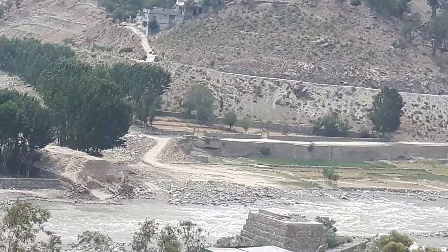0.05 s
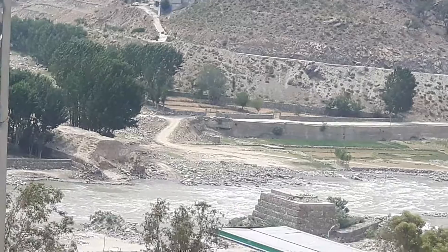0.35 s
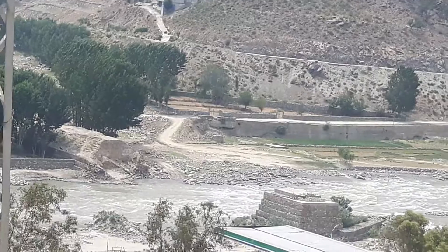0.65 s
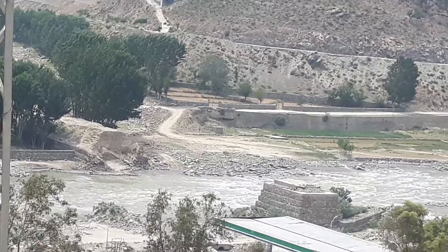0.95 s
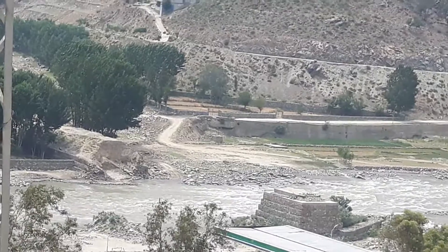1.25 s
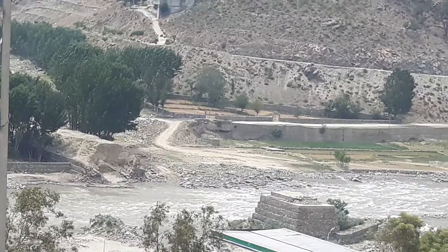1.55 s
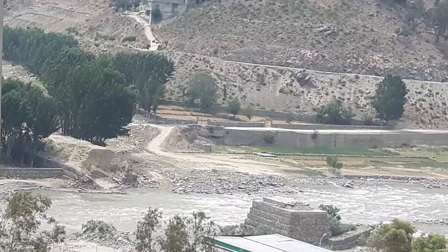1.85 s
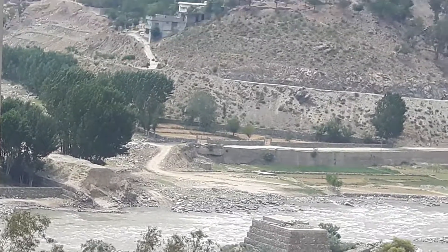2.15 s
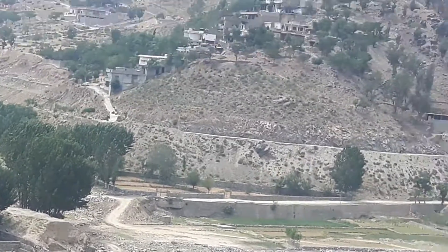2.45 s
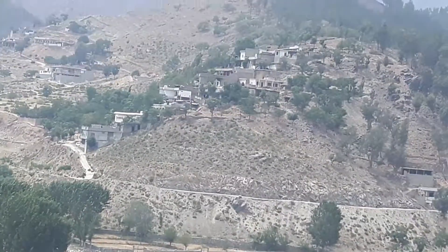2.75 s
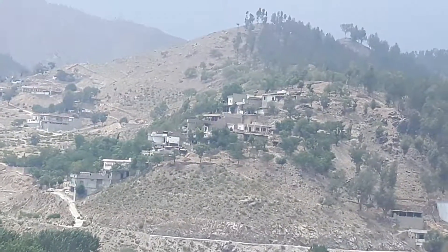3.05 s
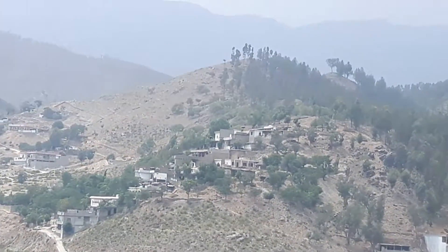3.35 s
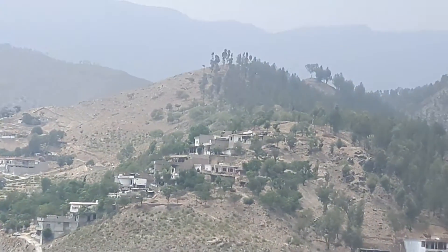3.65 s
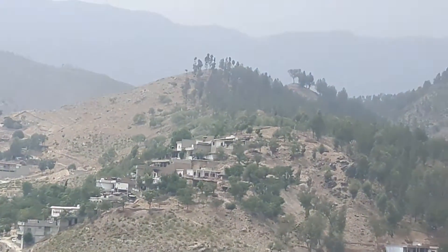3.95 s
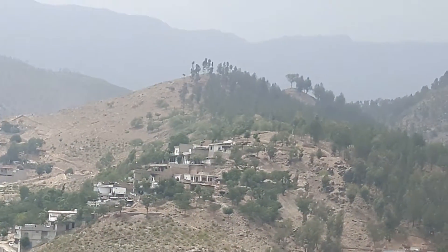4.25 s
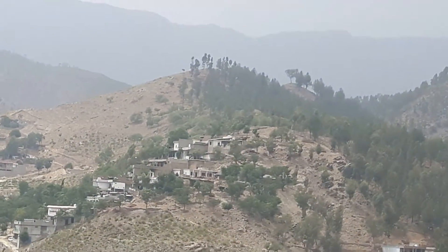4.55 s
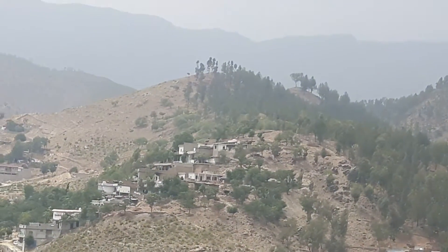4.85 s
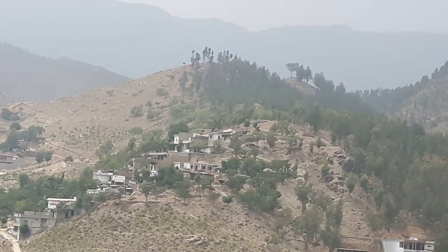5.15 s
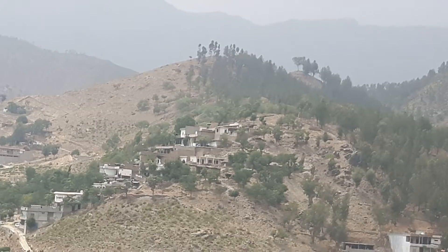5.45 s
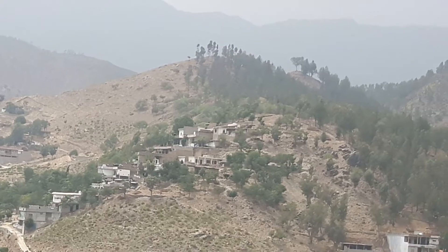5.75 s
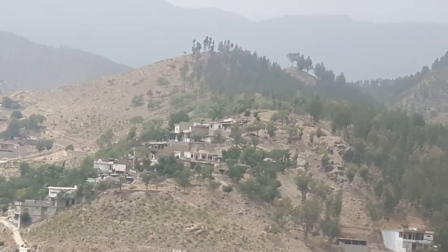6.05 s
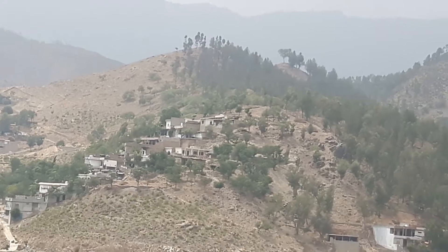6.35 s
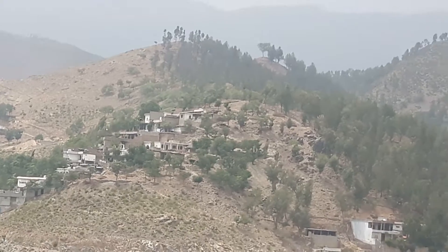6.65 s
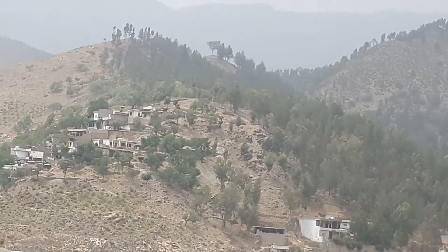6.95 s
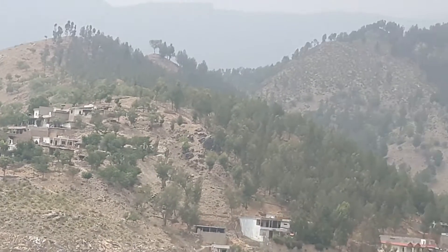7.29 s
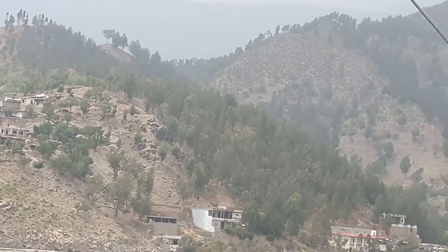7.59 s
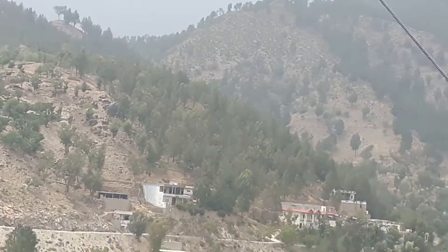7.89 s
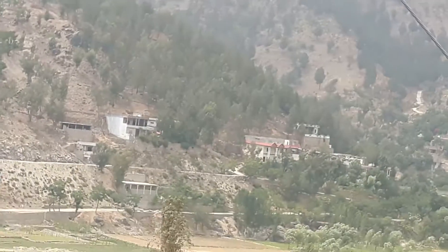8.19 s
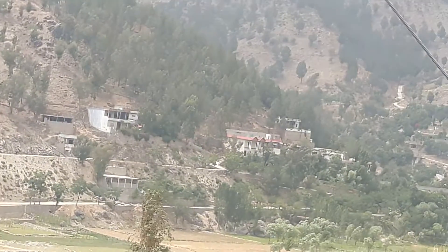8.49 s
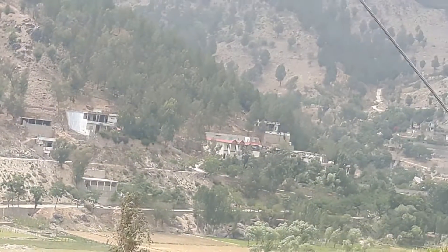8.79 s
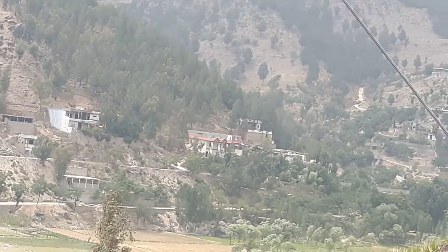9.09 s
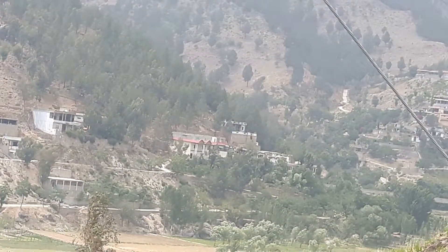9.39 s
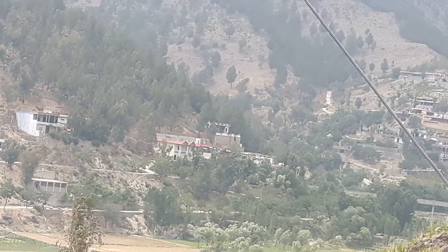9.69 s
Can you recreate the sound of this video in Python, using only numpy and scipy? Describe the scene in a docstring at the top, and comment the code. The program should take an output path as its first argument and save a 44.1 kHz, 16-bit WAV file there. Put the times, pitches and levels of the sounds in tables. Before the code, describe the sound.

A fast river rushes far below while gusts of wind rumble and thump against the microphone outdoors.

```python
"""Wind buffets the microphone: gusts carry eddies past its port, louder and higher the harder they blow.
Behind it a fast river rushes on the valley floor below, countless bubbles dulled by distance.
Near by, air hisses and faintly whistles round obstacles, and leaves brush together.
Far machinery hums faintly, and a distant bird gives a few falling chirps near the end."""
import sys
import numpy as np
from scipy import signal
from scipy.fft import rfft, irfft, next_fast_len
from scipy.io import wavfile
from scipy.ndimage import uniform_filter1d, map_coordinates

SR = 44100
rng = np.random.default_rng(int(sys.argv[2]) if len(sys.argv) > 2 else 0)


def unload_audio(sound):
    """Save the sound as a 16-bit wav file, at the path given as the first command line argument."""
    columns = np.transpose(np.atleast_2d(sound))
    # keep every value between -1 and 1, then stretch to whole-number steps
    steps = np.round(np.clip(columns, -1, 1) * 32767)
    wavfile.write(sys.argv[1], SR, steps.astype(np.int16))


N = 433503

# gusts at the port, head-on ones pitched above grazing ones: middle t/s, length/s, level/dB, shift/octaves
GUSTS = [(0.43, .11, -21, -0.052), (.83, .11, -18, -0.18), (1.068, 0.048, -29, -0.23),
         (1.168, 0.066, -25, -0.19), (1.383, .14, -26, -0.18), (1.564, 0.049, -20, -0.23),
         (1.709, .12, -31, -0.21), (2.537, 0.089, -26, -0.38), (3.109, .16, -26, -0.43),
         (3.561, 0.057, -29, -0.13), (3.762, 0.21, -23, 0.16), (4.018, 0.092, -17, -0.34),
         (4.158, 0.047, -26, -.1), (4.296, 0.045, -26, 0), (4.455, 0.15, -20, .1), (4.585, 0.045, -26, -.1),
         (4.707, .03, -19.5, -0.41), (5.425, .2, -16, -.1), (5.742, .18, -16.5, 0.028),
         (6.379, 0.41, -24, -0.044), (6.77, .17, -23.5, -.1), (7.046, .19, -20, -0.038),
         (8.827, .11, -22, -.05), (9.199, .11, -30.5, -0.13), (9.564, .13, -20, -.2)]


def from_db(db):
    """Decibels to gain."""
    return 10 ** (np.asarray(db) / 20)


def rms_one(x):
    """Scale to unit power."""
    return x / np.sqrt(np.mean(x ** 2) + 1e-20)


def in_time(rows):
    """A curve through (t/s, value) points, at every sample."""
    return np.interp(np.arange(N) / SR, *np.transpose(rows))


def coloured(x, spectrum):
    """EQ a signal through (f/Hz, level/dB) points; unit power."""
    hz, db = np.transpose(spectrum)
    bins = np.maximum(np.fft.rfftfreq(len(x), 1 / SR), 1)
    gain = from_db(np.interp(np.log(bins), np.log(hz), db))
    return rms_one(irfft(rfft(x) * gain, len(x)))


def drift(rate_hz):
    """Smooth random modulation, mostly slower than rate_hz; unit power."""
    size = next_fast_len(N)
    rolloff = 1 + (np.fft.rfftfreq(size, 1 / SR) / rate_hz) ** 2
    return rms_one(irfft(rfft(rng.standard_normal(size)) / rolloff, size)[:N])


def resonance(x, hz, width_hz):
    """Two-pole band-pass with gain 1 at its peak."""
    r = np.exp(-np.pi * width_hz / SR)
    feedback = [1, -2 * r * np.cos(2 * np.pi * hz / SR), r * r]
    return signal.lfilter(np.array([1, 0, -1]) * (1 - r * r) / 2, feedback, x)


def swell(middle_s, length_s, steepness=3.0):
    """Envelope of a puff of air: it rises to 1, holds briefly and falls away."""
    away = np.abs(np.arange(N) / SR - middle_s) / (length_s / 2)
    return np.where(away < 4, np.exp(-away ** steepness), 0)


def bird(blur=.6):
    """Each far chirp is a short whistle that slides down, blurred by its many paths through the trees."""
    # falling chirps: t/s, length/s, start f/Hz, end f/Hz, level/dB
    chirps = [(8.871, 0.067, 4850, 4070, -71), (9.061, 0.036, 5150, 4750, -78),
              (9.541, 0.043, 4935, 4587, -69.5), (9.569, 0.019, 4282, 4173, -65)]
    out = np.zeros(N)
    for s, length_s, start_hz, end_hz, db in chirps:
        size, at = int(length_s * SR), int(s * SR)
        phase = 2 * np.pi * np.cumsum(np.linspace(start_hz, end_hz, size)) / SR
        out[at:at + size] += from_db(db) * np.sqrt(np.hanning(size)) * np.sin(phase)
    return out * (1 - blur + blur * drift(150))


def leaves(touches_per_s=2700.0, spread_db=3.0, idle_db=-86.5, tick_s=.002):
    """Leaf brushes leaf in a dense patter of uneven touches, with now and then a sharper tick."""
    # flurries in the leaves: middle t/s, length/s, level/dB
    flurries = [(1.246, 0.84, -81.5), (1.898, .35, -77)]
    # tone of the rustle: f/Hz, relative level/dB
    rustle = [(1000, -22), (3000, 5.5), (4400, 6.5), (5600, -8.5), (7400, 0.5), (9000, -9.5), (15000, -26)]
    # small dry ticks: t/s, level/dB
    ticks = [(1.2683, -61), (2.0472, -69), (6.27, -65), (8.4566, -63)]
    size = next_fast_len(N)
    touches = (rng.random(size) < touches_per_s / SR) * rng.standard_normal(size)
    touches *= from_db(spread_db * np.minimum(rng.exponential(1, size), 5))
    stir = from_db(idle_db) + sum(from_db(db) * swell(s, length_s) for s, length_s, db in flurries)
    out = stir * coloured(touches, rustle)[:N]
    crack = coloured(rng.standard_normal(size), rustle)
    age = np.arange(SR // 20) / SR
    for s, db in ticks:
        near = slice(int(s * SR), int(s * SR) + len(age))
        out[near] += from_db(db) * np.exp(-age / tick_s) * crack[near]
    return out


def sweeping_air(whistle_width_hz=27):
    """Air hisses round nearby obstacles, and the vortices it sheds sound a breathy whistle."""
    # sweeps of air: middle t/s, length/s, hiss level/dB, whistle level/dB, whistle f/Hz
    sweeps = [(2.037, 0.32, -62, -67, 1810), (2.621, 0.76, -61, -59.5, 1822),
              (4.455, 0.61, -61.5, -59.5, 1768), (5.072, 0.32, -65, -59.5, 1760),
              (6.37, 0.61, -63, -59.5, 1825), (7.05, .7, -65.5, -62.5, 1791), (8.93, .35, -68, -59.5, 1807)]
    # tone of the hiss: f/Hz, relative level/dB
    hiss_tone = [(800, -18), (1500, -2.5), (2100, 6), (2900, -6), (3800, -12), (4600, -12), (5600, -30.5),
                 (9000, -49)]
    hiss = coloured(rng.standard_normal(next_fast_len(N)), hiss_tone)[:N]
    vortices = rng.standard_normal(N)
    out = np.zeros(N)
    for s, length_s, hiss_db, whistle_db, hz in sweeps:
        whistle = rms_one(resonance(vortices, hz, whistle_width_hz))
        out += swell(s, length_s) * (from_db(hiss_db) * hiss + from_db(whistle_db) * whistle)
    return out


def machinery():
    """A low hum whose tones waver and fade on their way across the valley."""
    # tones of the hum: f/Hz, width/Hz, level/dB
    tones = [(68, 6.5, -62), (94.2, 4.9, -48), (147.7, 3.6, -50.5), (178.4, 3.2, -53), (202.4, 6.2, -52),
             (325, 9.7, -52.5), (356, 4.1, -54.5)]
    out = np.zeros(N)
    for hz, width_hz, db in tones:
        phase = 2 * np.pi * hz * np.arange(N) / SR
        out += from_db(db) * (drift(width_hz / 2) * np.cos(phase) + drift(width_hz / 2) * np.sin(phase))
    return out


def river(gain_db=12.0, churn_db=1.23, churn_hz=4.9):
    """Countless far bubbles merge into a rush; each size of bubble swells and ebbs as the rapids churn."""
    # the river bed of sound, a little louder when the microphone faces it: t/s, level/dB before gain_db
    flow = [(0.1, -52.5), (1.54, -53.5), (5.5, -52), (9.7, -53.5)]
    # tone of the rush, dulled by distance: f/Hz, relative level/dB
    rush_tone = [(20, -26), (50, -6.5), (90, 2.5), (230, 4), (350, 6), (480, 0), (800, -2), (1150, -8.5),
                 (1750, -12), (2300, -20), (2950, -28.5), (4000, -37), (5600, -49.5), (9000, -58.5)]
    size = next_fast_len(N)
    rush = rfft(coloured(rng.standard_normal(size), rush_tone))
    octave = np.log2(np.maximum(np.fft.rfftfreq(size, 1 / SR), 1))
    out = np.zeros(N)
    for centre in range(4, 15):   # octave bands, 16 Hz to 16 kHz
        band = irfft(rush * np.maximum(1 - np.abs(octave - centre), 0), size)[:N]
        out += band * from_db(churn_db * drift(churn_hz))
    return out * from_db(in_time(flow) + gain_db)


def wind_pressure(gust_trim_db=-0.83, wake_db=-14.0, wake_spread=2.0, calm_db=-37.0,
                  flutter_db=3.5, flutter_hz=26.0, buffet_trim_db=-1.57, rise_s=0.002496, fall_s=.012):
    """Envelope of the wind: fluttering gusts over a breeze, and a sudden shove from each strong eddy."""
    # the breeze between gusts: t/s, relative level/dB
    breeze = [(0, -38), (1.4, -35), (2.0, -47), (2.7, -41), (2.95, -33), (3.45, -41), (3.9, -34),
              (5.1, -33), (6.0, -36), (7.1, -32), (7.45, -43.5), (8.65, -44.5), (9.05, -34.5),
              (9.83, -36.5)]
    # thumps of the hardest single eddies: t/s, relative level/dB
    buffets = [(0.34, -16), (0.403, -10), (0.456, -15), (.735, -13.5), (0.801, -8), (.874, -10.5),
               (1.374, -13.5), (3.115, -16), (3.685, -12.5), (3.721, -12.5), (3.935, -14), (4.011, -11),
               (4.393, -8), (4.452, -9.5), (4.696, -12.5), (5.345, -9), (5.423, -7), (5.457, -10.5),
               (5.68, -4), (5.7, -3), (5.774, -8.5), (5.882, -18.5), (6.346, -9.5), (7.066, -12.5),
               (8.768, -8), (9.15, -18.5), (9.185, -8), (9.24, -8), (9.547, -5.5), (9.613, -9),
               (9.678, -14.5)]
    t = np.arange(N) / SR
    gust_power = from_db(in_time(breeze)) ** 2
    for s, length_s, db, _ in GUSTS:
        core = swell(s, length_s)
        wake = from_db(wake_db) * swell(s, wake_spread * length_s)
        gust_power += from_db(db) ** 2 * (core ** 2 + wake ** 2)
    gust = np.sqrt(gust_power)
    # gentle air slides past the port without breaking into eddies
    turbulent = gust ** 4 / (gust ** 4 + from_db(calm_db) ** 4)
    flutter = np.minimum(drift(flutter_hz), 1.5)
    power = turbulent * (gust * from_db(gust_trim_db + flutter_db * flutter)) ** 2
    for s, db in buffets:
        near = slice(int(s * SR), int(s * SR) + SR // 10)
        age = np.maximum(t[near] - s, 0)
        shove = (1 - np.exp(-(age / rise_s) ** 2)) * np.exp(-age / fall_s)
        power[near] += (from_db(db + buffet_trim_db) * shove) ** 2
    return np.sqrt(power)


def wind(strong_gust_db=-20.5, db_per_octave=30.0, eddy_s=0.017, low_cut_hz=63.0):
    """A frozen field of eddies is swept past the port; faster air raises both pitch and pressure."""
    # rumble of the eddies in a strong gust: f/Hz, relative level/dB
    eddy_tone = [(15, -16.5), (30, -12), (60, -7.5), (100, 0.5), (160, 2.5), (250, -5), (350, -11.5),
                 (500, -22.5), (800, -41.5), (1600, -64), (4000, -95.5)]
    pressure = wind_pressure()
    veer = in_time([(s, shift) for s, _, _, shift in GUSTS])   # the wind turns from gust to gust
    octaves = (20 * np.log10(pressure) - strong_gust_db) / db_per_octave + veer
    speed = 2 ** np.clip(octaves, -1, 1)
    field = coloured(rng.standard_normal(next_fast_len(N)), eddy_tone)
    # level the eddies, so that the envelope alone sets the force
    field /= np.sqrt(uniform_filter1d(field ** 2, int(eddy_s * SR)) + 1e-6)
    swept = map_coordinates(field, [np.cumsum(speed)], order=3, mode="wrap")
    low_cut = signal.butter(2, low_cut_hz, "high", fs=SR, output="sos")
    return signal.sosfilt(low_cut, pressure * swept)


def scene():
    """Mono mix: river, hum and bird far off, leaves and air near by, wind right at the microphone."""
    return (river() + machinery() + bird() + leaves() + sweeping_air() + wind())[None, :]


def record(dry, hiss_db=-80.5, cutoff_hz=15700):
    """The microphone port rings in the treble, the electronics hiss faintly, the top is cut."""
    # resonances of the port: f/Hz, width/Hz, lift/dB
    port = [(3370, 250, 10), (6600, 570, 5), (7280, 550, 5)]
    ring = sum((from_db(lift_db) - 1) * resonance(dry, hz, width_hz) for hz, width_hz, lift_db in port)
    hiss = from_db(hiss_db) * rng.standard_normal(dry.shape)
    high_cut = signal.ellip(10, .1, 80, cutoff_hz, fs=SR, output="sos")
    return signal.sosfilt(high_cut, dry + ring + hiss)


dry = scene()
out = record(dry)
unload_audio(out)
```